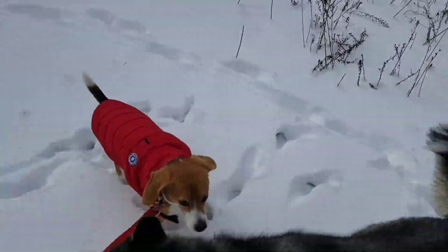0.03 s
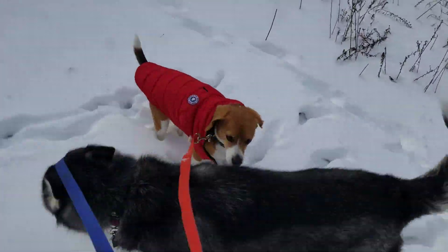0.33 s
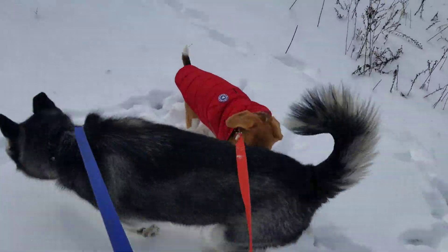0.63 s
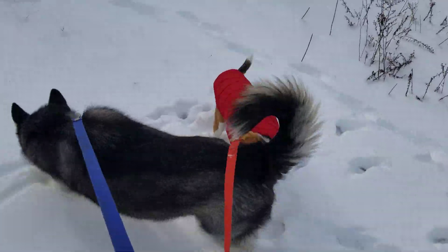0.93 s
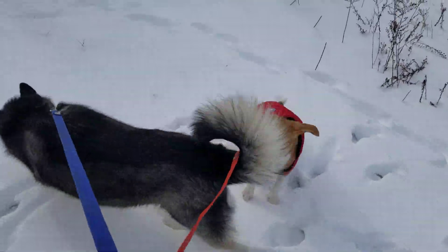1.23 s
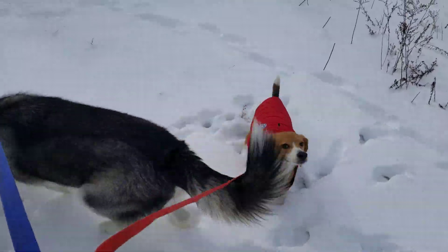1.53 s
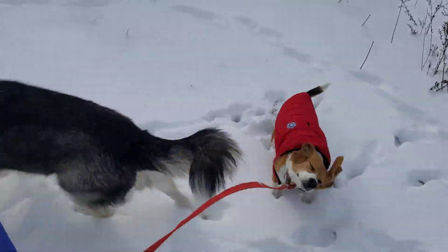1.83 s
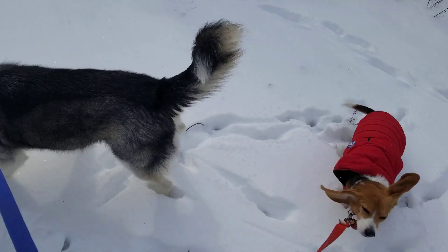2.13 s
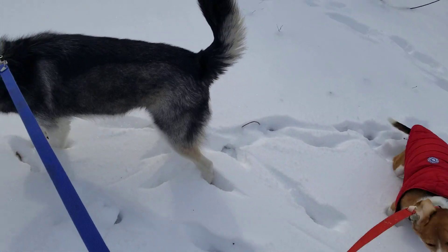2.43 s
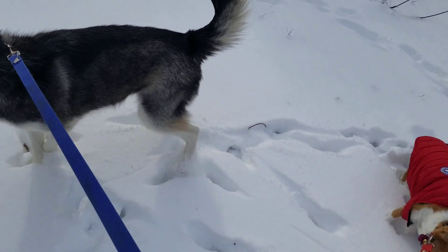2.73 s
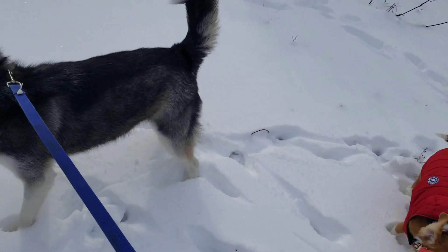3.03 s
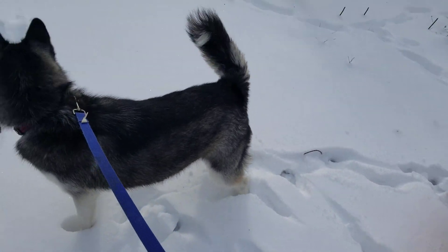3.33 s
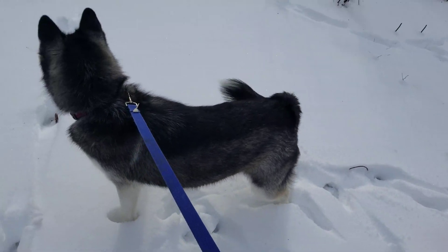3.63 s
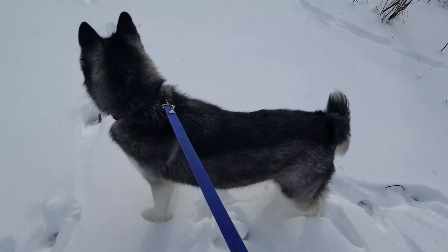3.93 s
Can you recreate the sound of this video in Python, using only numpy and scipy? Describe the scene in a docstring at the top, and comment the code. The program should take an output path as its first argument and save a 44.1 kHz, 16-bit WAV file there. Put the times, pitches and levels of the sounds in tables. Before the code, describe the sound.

Collar tags and a leash clasp jingle as two dogs crunch through snow.

```python
"""Collar tags tinkle and a leash clasp clacks as two dogs walk through snow, close by in the open air.
Each impact excites the damped modes of the metal, most often once the big dog steps forward.
Paws crunch by breaking ice grains and crust; before that, coats and leashes swish by friction
as the dogs nose around. A low wind rumble lies under it all."""
import sys
import numpy as np
from scipy import signal
from scipy.fft import rfft, irfft
from scipy.io import wavfile
from scipy.ndimage import uniform_filter1d

SR = 44100
rng = np.random.default_rng(int(sys.argv[2]) if len(sys.argv) > 2 else 0)


def store_wav(level_fs):
    """Save 16-bit WAV to argv[1]."""
    pcm = np.round(np.clip(np.atleast_2d(level_fs), -1, 1) * 32767)
    wavfile.write(sys.argv[1], SR, pcm.T.astype(np.int16))


N = 176400

# two close modes that form the note of the collar tag: f/Hz, relative level/dB
TAG_MODES = [(4587, -0.5), (4650, -5.5)]
# lower and upper modes of the leash hardware: f/Hz, relative level/dB
LOW_MODES = [(4150, 6.6), (4800, 11.7), (5300, 8.5), (5950, 3.5)]
HIGH_MODES = [(10830, -14.5), (11420, 2.5), (11650, -2.5), (15050, 0.5)]
CONTACT_S = .0013  # time constant of a metal contact
PORT_LAG_S, PORT_PHASE_RAD = .00017, 1.2  # delay and phase spread between the two microphone ports


def amp(db):
    """Amplitude ratio: a factor of ten for every 20 dB."""
    return 10 ** (np.asarray(db) / 20)


def unit_rms(x):
    """Normalisation to unit mean power."""
    return x / np.sqrt(np.mean(x ** 2) + 1e-20)


def unit_burst(x):
    """Normalisation of a transient to unit power over its loudest three milliseconds."""
    power = uniform_filter1d((x ** 2).mean(0), 130, mode="constant")
    return x / np.sqrt(power.max() + 1e-20)


def spectrum(points, size=N):
    """Interpolation over log frequency, giving a value for every Fourier bin."""
    hz, value = np.transpose(points)
    return np.interp(np.log(np.fft.rfftfreq(size, 1 / SR) + 1), np.log(hz), value)


def envelope(points):
    """Amplitude envelope, linear in decibels between the given times."""
    return amp(np.interp(np.arange(N) / SR, *np.transpose(points)))


def colour(x, points):
    """Zero-phase filtering: the spectrum is multiplied by a gain curve."""
    size = x.shape[-1]
    return irfft(rfft(x) * amp(spectrum(points, size)), size)


def correlate(z, coherence):
    """Partial coherence: two independent noises are mixed to share a component."""
    return np.array([z[0], coherence * z[0] + np.sqrt(1 - coherence ** 2) * z[1]])


def lagged(x, lag_s):
    """Path difference: sound from one side reaches the far port later (the left, for a positive lag)."""
    hz = np.fft.rfftfreq(N, 1 / SR)
    return irfft(rfft(x) * np.exp(-2j * np.pi * hz * np.array([[lag_s], [0]])), N)


def add(mix, start_s, sound):
    """Superposition: a sound adds to the mix from its onset."""
    part = mix[:, round(start_s * SR):][:, :sound.shape[1]]
    part += sound[:, :part.shape[1]]


def wind():
    """Turbulence: a steady rumble whose coherence between the ports falls with frequency."""
    rumble = [(20, -47), (45, 1.5), (76, 4.5), (100, -4), (135, -15), (180, -8), (270, -8), (600, -20.5),
              (900, -23), (1500, -50.5), (4500, -54), (8000, -101), (12000, -54)]  # f/Hz, relative spectral level/dB
    coherence = [(100, 1), (500, 0.83), (1200, 0.36)]  # f/Hz, coherence/1
    noise = correlate(rfft(rng.standard_normal((2, N))), spectrum(coherence))
    return amp(-38.5) * unit_rms(colour(irfft(noise, N), rumble))


def hiss(size):
    """White noise, partly coherent at the two ports."""
    return correlate(rng.standard_normal((2, size)), coherence=.65)


def grains(per_s, size=N):
    """Shot noise: independent clicks of uneven strength."""
    strength = amp(3.5 * np.minimum(rng.exponential(1, size), 3.5))
    occurs = rng.random(size) < per_s / SR
    return strength * occurs * correlate(rng.standard_normal((2, size)), coherence=.75)


def fits_and_starts(spread_db=4.5, changes_per_s=110):
    """Random amplitude modulation: rubbing comes in short spurts."""
    position = np.arange(N) / SR * changes_per_s
    count = int(position[-1]) + 2
    swings = np.clip(rng.standard_normal(count), -2, 2)
    return unit_rms(amp(spread_db * np.interp(position, np.arange(count), swings)))


def swish():
    """Friction noise: cloth and fur brush through powder, a soft hiss with spurts of coarse grains."""
    brushing = [(0, -60.5), (.16, -64), (.26, -55.5), (.44, -55.5), (.55, -57), (.84, -58.5), (.94, -55),
                (1.18, -65.5), (1.33, -60.5), (1.53, -70.5), (1.8, -76)]  # strength of the rubbing: t/s, relative level/dB
    body_shape = [(300, 4.5), (800, 6.5), (2000, 5.5), (4500, -7.5), (8500, -20.5), (16000, -15)]  # main spectrum: f/Hz, relative level/dB
    treble_shape = [(3000, -22), (6000, -15.5), (8600, -22), (10300, -5.5), (16000, -6)]  # spectrum of the fine hiss: f/Hz, relative level/dB
    end_s, fade_s = 2.15, .49
    fade = np.clip((end_s - np.arange(N) / SR) / fade_s, 0, 1)
    motion = envelope(brushing)
    powder = hiss(N)
    coarse = unit_rms(grains(per_s=1200) * fits_and_starts())
    body = amp(7.5) * motion * unit_rms(colour(powder + amp(-8) * coarse, body_shape))
    treble = amp(-37) * motion ** .43 * unit_rms(colour(powder, treble_shape))  # swells less than the body
    return lagged(fade * (body + treble), -PORT_LAG_S)


def clinks(decay_s=.00045):
    """Heavily damped impact: taut links snap together and vibrate for only a few cycles."""
    snaps = [(0.1505, 12600, -44.5), (0.2488, 6800, -46.5), (0.3935, 5170, -51), (1.1368, 4860, -51.5),
             (2.7768, 5260, -23.5)]  # link impacts: t/s, f/Hz, level/dB
    out, t = np.zeros((2, N)), np.arange(1000) / SR
    for s, hz, db in snaps:
        phase = np.array([[0], [PORT_PHASE_RAD * rng.standard_normal()]])
        pulse = t * np.exp(-t / decay_s) * np.sin(2 * np.pi * hz * t + phase)
        add(out, s, amp(db) * unit_burst(pulse))
    return out


def ring(modes, t60, detune=0, size=8000):
    """Free vibration: modes of random strength and phase decay by 60 dB in t60 seconds."""
    t, out = np.arange(size) / SR, np.zeros((2, size))
    for hz, db in modes:
        strength, turn, shift, start = rng.standard_normal(4)
        phase = np.pi * start + np.array([[0], [turn * PORT_PHASE_RAD]])
        out += amp(db + 3.5 * strength) * np.sin(2 * np.pi * hz * (1 + detune * shift) * t + phase)
    return unit_burst(out * np.exp(-np.log(1000) * t / t60))


def rattled(sound, decay_s, touches_per_s=1500):
    """Repeated excitation: loose metal touches many times, so its response is convolved with a pulse train."""
    size = sound.shape[1]
    t = np.arange(size) / SR
    touches = rng.standard_normal(size) * (rng.random(size) < touches_per_s / SR) * np.exp(-t / decay_s)
    touches[0] = 1
    return unit_burst(signal.fftconvolve(sound, touches[None], axes=1)[:, :size])


def contact(low_hz, high_hz, size=8000):
    """Contact noise: two metal parts scrape as they meet, giving a band-limited burst."""
    age = np.arange(size) / SR / CONTACT_S
    band = signal.butter(2, [low_hz, high_hz], "band", fs=SR, output="sos")
    return unit_burst(signal.sosfilt(band, hiss(size) * age ** .5 * np.exp(-age)))


def tags():
    """Plate vibration: a struck tag sounds a clear note, choked or left to ring, under contact chatter."""
    strikes = [(0.322, -48, -49.5, 0.085), (0.6018, -47.5, -54, 0.046), (0.7055, -45.5, -58, .04),
               (1.619, -55, -63, 0.067), (1.6823, -48.5, -54, .025), (1.7726, -41, -48, 0.066),
               (1.941, -38.5, -48, 0.041), (1.9525, -37, -50, 0.035), (2.2024, -31.5, -45, 0.031),
               (2.2257, -45, -37, 0.053), (2.242, -41.5, -37.5, 0.046), (2.395, -40, -47, 0.061),
               (2.475, -36.5, -38, 0.042), (2.5635, -34, -44, 0.064), (2.5804, -32.5, -44, 0.08),
               (2.643, -36.5, -43, 0.032), (2.689, -35.5, -60, 0.022), (2.8079, -42, -53, 0.035),
               (2.9237, -40, -41, 0.037), (3.052, -37.5, -44, 0.11), (3.1226, -35, -47.5, .05),
               (3.199, -35.5, -50, 0.041), (3.3172, -30.5, -41.5, 0.036), (3.515, -46, -51.5, 0.11),
               (3.5616, -32.5, -47.5, 0.075), (3.6446, -45.5, -63, 0.043), (3.709, -49.5, -58.5, 0.064),
               (3.833, -53, -81, .09)]  # t/s, note level/dB, relative level of chatter and overtones/dB, T60/s
    upper_modes = [(11560, -4), (13140, 3), (14400, 1), (15020, -4)]  # overtones of the tag: f/Hz, relative level/dB
    small_strikes = [(1.6754, -46), (1.795, -42)]  # on the small dog's thin tag: t/s, relative level/dB
    small_modes = [(9970, 8), (10450, -6)]  # modes of that tag: f/Hz, relative level/dB
    out = np.zeros((2, N))
    for s, note_db, bright_db, t60 in strikes:
        rattle_s = .13 * t60  # a tag that rings longer also rattles longer
        add(out, s, amp(note_db) * rattled(ring(TAG_MODES, t60), rattle_s))
        chatter = rattled(contact(10300, 16000) + 1.4 * contact(4400, 6500), rattle_s)
        overtones = rattled(ring(upper_modes, t60 / 2, detune=.006), rattle_s)
        add(out, s, amp(bright_db + .5) * unit_burst(chatter + rng.uniform(.3, 1.5) * overtones))
    to_right = amp([[-8.5], [.5]])
    for s, db in small_strikes:
        add(out, s, amp(db) * to_right * rattled(ring(small_modes, t60=.05), CONTACT_S))
    return out


def stepping(midpoint_s=1.8, rise_s=.2):
    """Onset ramp: the gain rises from zero to one as the big dog starts forward."""
    return np.clip((np.arange(N) / SR - midpoint_s) / rise_s + .5, 0, 1)


def chafe(links=12, ticks_per_s=2000, t60=.011):
    """Contact damping: links pressed together tick but hardly ring as they rub; the tag shivers along."""
    rubbing = [(1.7, -63), (2.2, -54.5), (2.5, -55), (2.6, -40.5), (2.68, -58.5), (2.85, -38), (2.9, -54.5),
               (3.6, -64), (3.9, -84.5)]  # strength of the chafing: t/s, level/dB
    ticks = np.zeros((2, N))
    for _ in range(links):
        tick = ring(HIGH_MODES, t60, detune=.108) + amp(1.5) * ring(LOW_MODES, t60, detune=.13)
        ticks += signal.oaconvolve(grains(ticks_per_s / links), tick, axes=1)[:, :N]
    shiver = signal.oaconvolve(grains(per_s=70), ring(TAG_MODES, t60=.05), axes=1)[:, :N]
    return (unit_rms(ticks) + unit_rms(shiver) / 2) * envelope(rubbing) * fits_and_starts()


def snow(break_s=.0026, size=2048):
    """Brittle fracture: ice grains snap as paws pack the snow, and clumps of crust break at once."""
    tread = [(1.75, -59.5), (2.25, -56.5), (2.42, -50.5), (2.6, -52.5), (2.86, -52), (3.3, -53.5),
             (3.55, -62.5), (3.9, -75.5)]  # packing under the paws: t/s, relative level/dB
    crunches = [(1.9213, -37), (1.988, -42), (2.0029, -34.5), (2.0705, -33), (2.384, -35), (2.4898, -36),
                (2.8627, -34), (3.6061, -40)]  # breaks in the crust: t/s, relative level/dB
    fracture_shape = [(300, 17), (1000, 6), (2800, 12.5), (4200, 7.5), (7000, -15), (11000, 0.5)]  # spectrum of breaking snow: f/Hz, relative level/dB
    fine = unit_rms(grains(per_s=1200)) + hiss(N)
    out = amp(5.5) * unit_rms(colour(fine, fracture_shape)) * envelope(tread) * fits_and_starts()
    age = np.arange(size) / SR / break_s
    for s, db in crunches:
        clump = grains(per_s=21000, size=size) * age ** .5 * np.exp(-age)
        add(out, s, amp(db - 1) * unit_burst(colour(clump, fracture_shape)))
    return lagged(out, PORT_LAG_S)


def clasp(t60=.017):
    """Impact excitation: the clasp knocks on its ring, a hard contact with quickly damped modes."""
    clacks = [(1.7733, -33, -44), (2.0347, -30, -38.5), (2.0559, -26, -38), (2.0728, -26, -27),
              (2.177, -29, -36), (2.283, -26.5, -45), (2.372, -22.5, -32), (2.385, -15, -24),
              (2.4257, -9, -25.5), (2.4371, -14, -27.5), (2.527, -21, -24), (2.532, -19.5, -40),
              (2.605, -25, -43), (2.7063, -27, -36), (2.7137, -23, -27.5), (2.7549, -17.5, -42),
              (2.7755, -20.5, -27), (2.8483, -24, -34), (2.8614, -22.5, -38), (2.955, -28, -38.5),
              (2.9684, -23, -42), (3.02, -27, -34), (3.179, -28.5, -48), (3.252, -26, -32.5),
              (3.469, -31, -54)]  # t/s, relative level of the upper band/dB, of the lower band/dB
    swing = [(2.2, 1.5), (2.4, -10.5), (2.6, -4.5)]  # side to which the clasp swings: t/s, left minus right level/dB
    out = np.zeros((2, N))
    for s, high_db, low_db in clacks:
        high_ring = rattled(ring(HIGH_MODES, t60, detune=.01), CONTACT_S)
        high = unit_burst(high_ring + amp(-6) * contact(8800, 16000))
        low_ring = rattled(ring(LOW_MODES, t60, detune=.03), CONTACT_S)
        low = unit_burst(low_ring + amp(-2) * contact(3500, 7200))
        pan = amp(np.interp(s, *np.transpose(swing)) * np.array([[.5], [-.5]]))
        add(out, s, amp(high_db - 13.5) * pan * high + amp(low_db - 7.5) * low)
    return out


def scene():
    """Free-field superposition: the sources add in open air, with no echo."""
    radiation = [(2400, -24), (3900, 0)]  # small metal parts radiate little bass: f/Hz, gain/dB
    metal = colour(clasp() + clinks() + tags() + stepping() * chafe(), radiation)
    return wind() + swish() + stepping() * snow() + metal


def record(dry):
    """Frequency response: each microphone port colours the sound its own way, then a low-pass limits it."""
    imbalance = [(50, 2), (700, 1.3), (1200, 1.5), (2200, -5), (3500, -5.5), (4600, 1.5), (8200, 7.5),
                 (9500, -4.5), (12000, -5.5), (15500, 5.5)]  # response of the ports: f/Hz, left minus right level/dB
    port_gains = amp(spectrum(imbalance) * np.array([[.5], [-.5]]))
    heard = irfft(rfft(dry) * port_gains, N)
    low_pass = signal.firwin(255, cutoff=16150, window=("kaiser", 8), fs=SR)
    return signal.oaconvolve(heard, low_pass[None], "same", axes=1)


dry = scene()
out = record(dry)
store_wav(out)
```